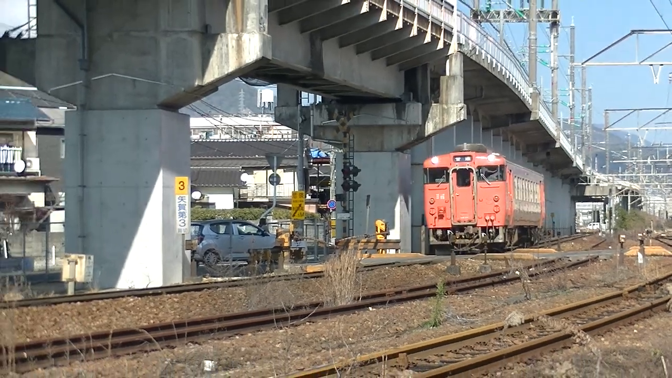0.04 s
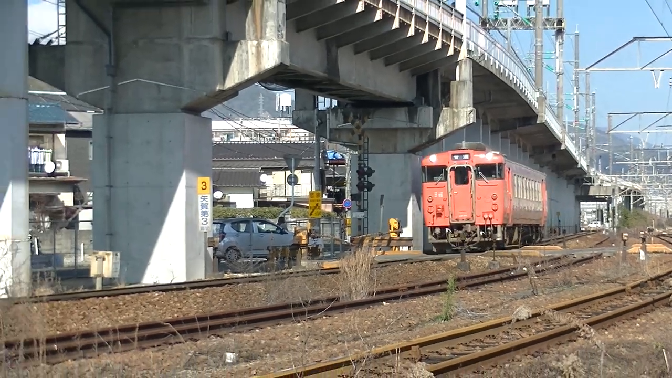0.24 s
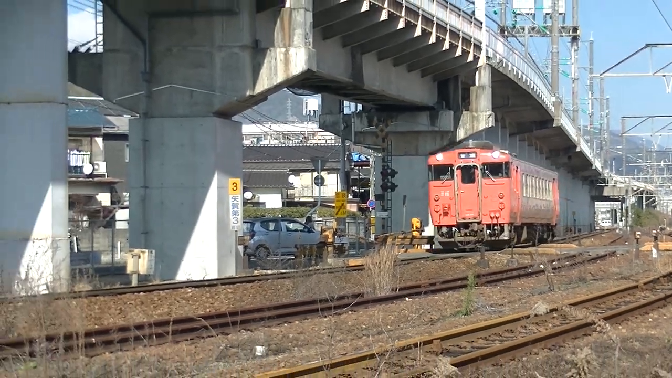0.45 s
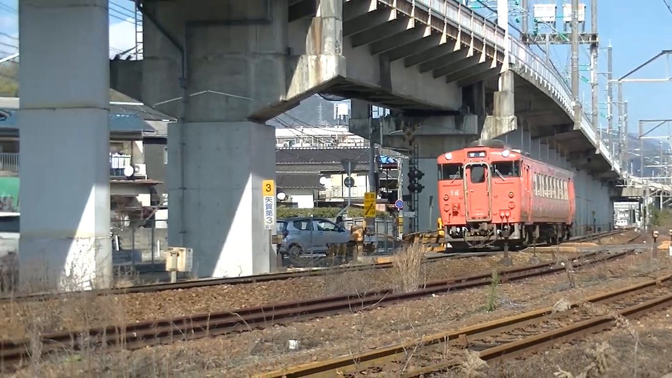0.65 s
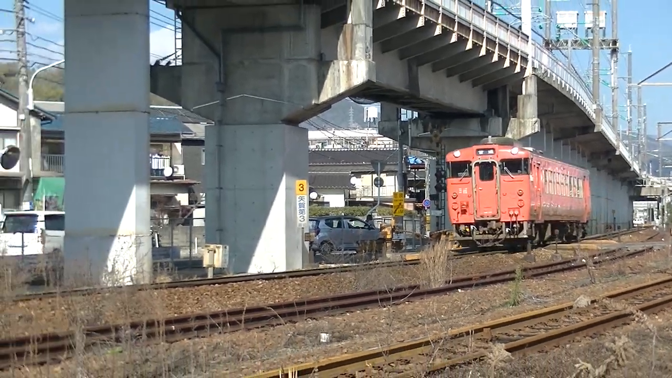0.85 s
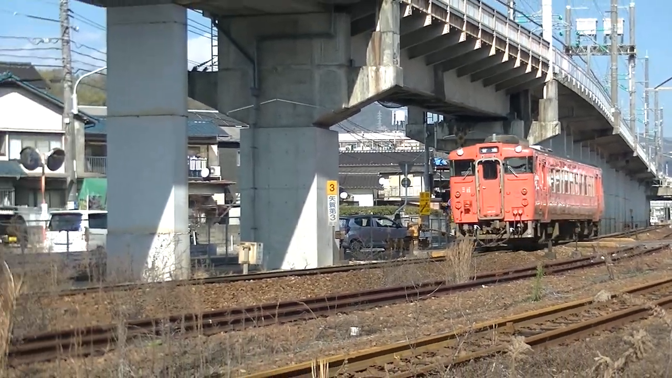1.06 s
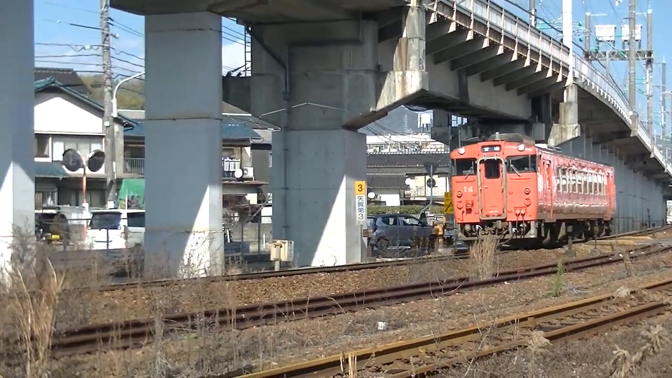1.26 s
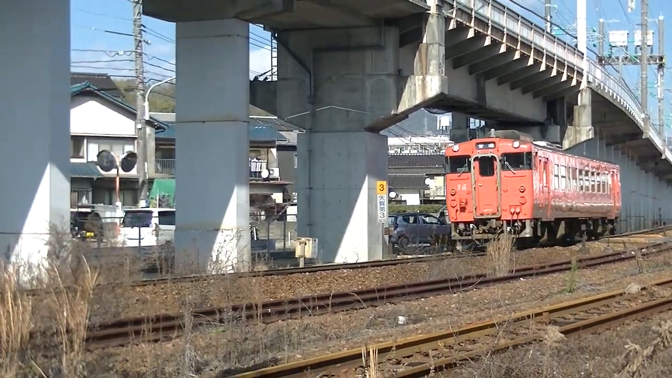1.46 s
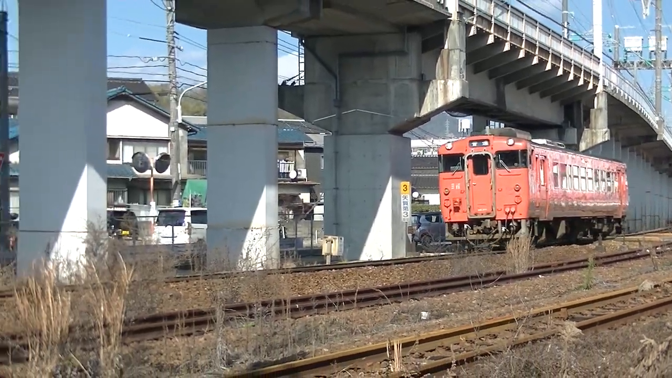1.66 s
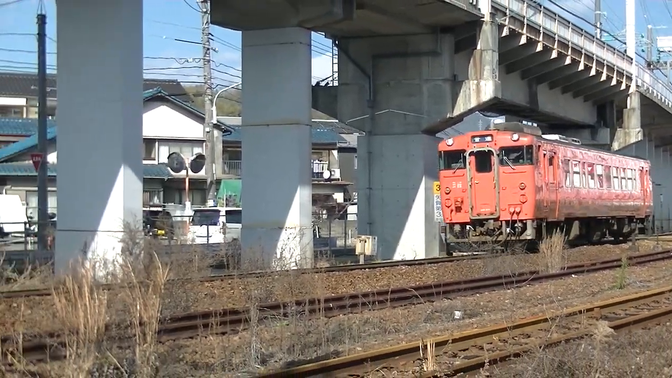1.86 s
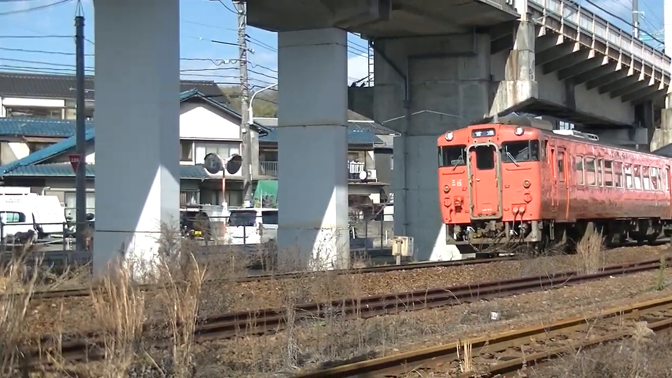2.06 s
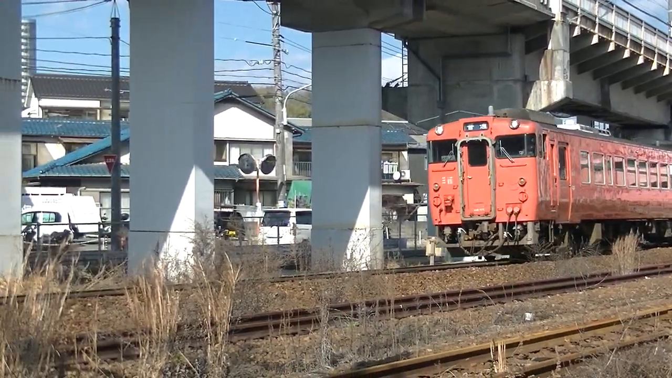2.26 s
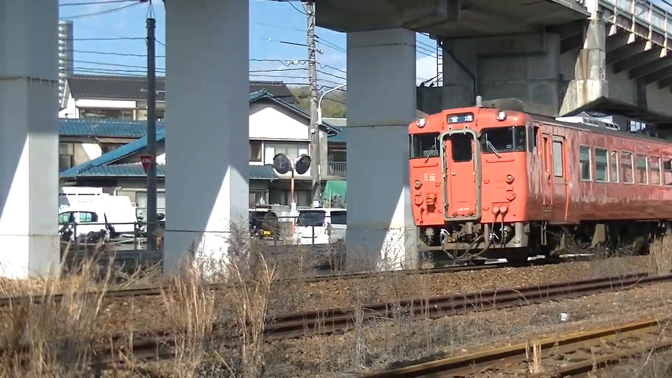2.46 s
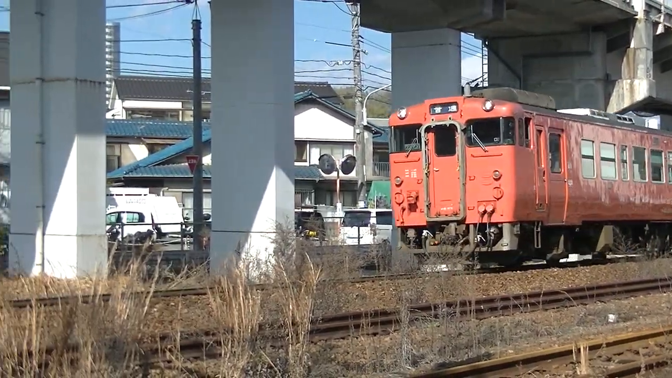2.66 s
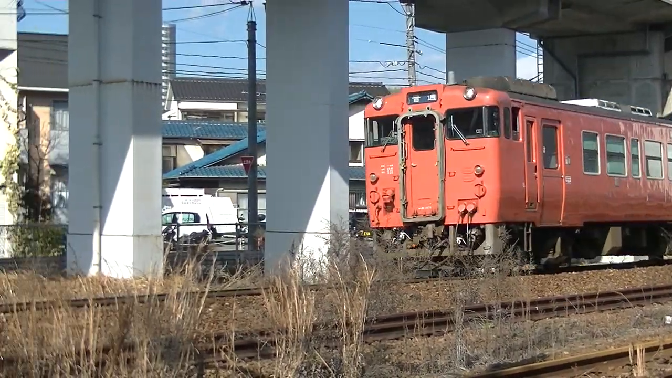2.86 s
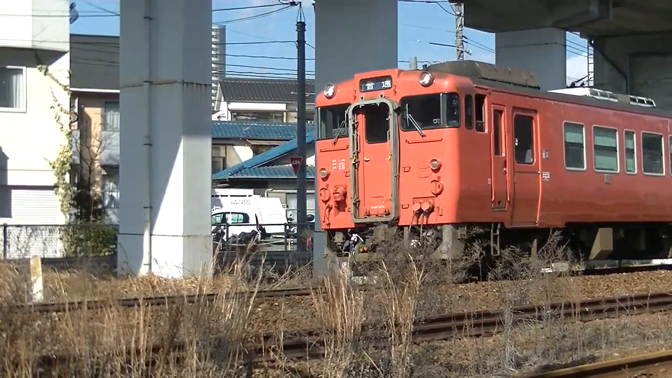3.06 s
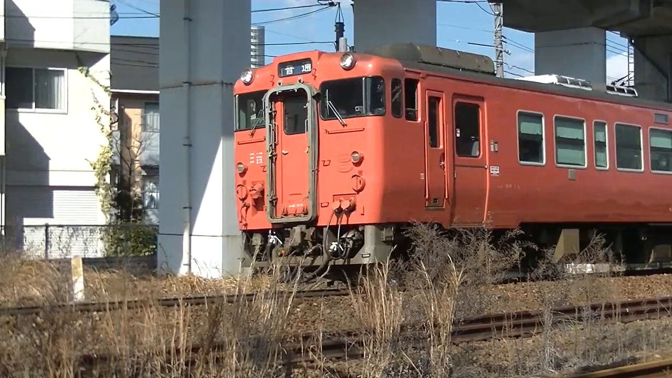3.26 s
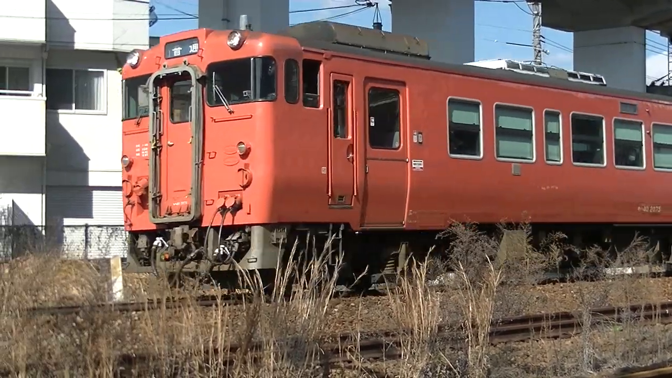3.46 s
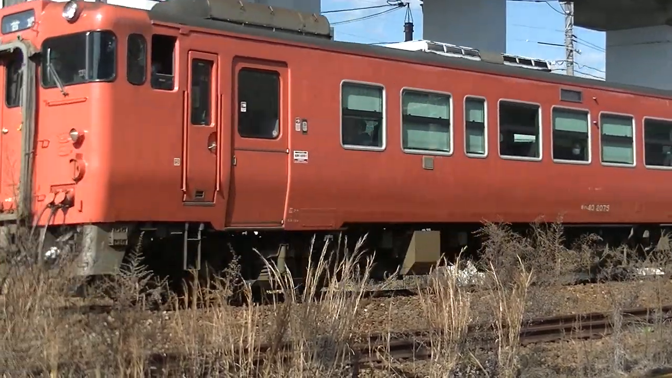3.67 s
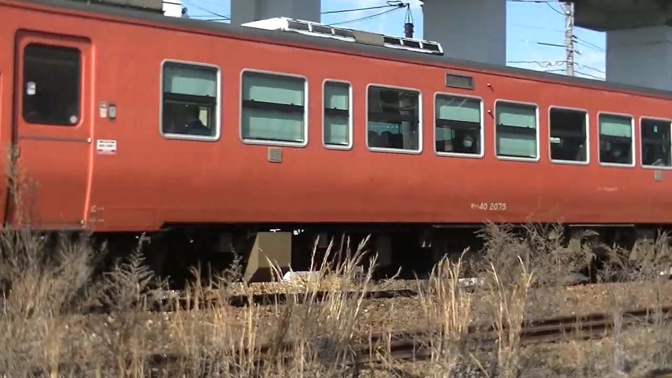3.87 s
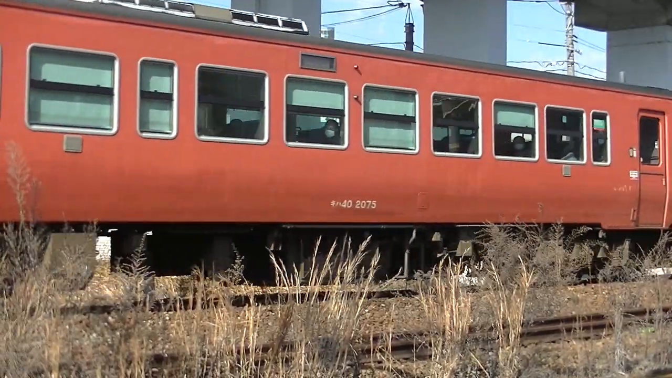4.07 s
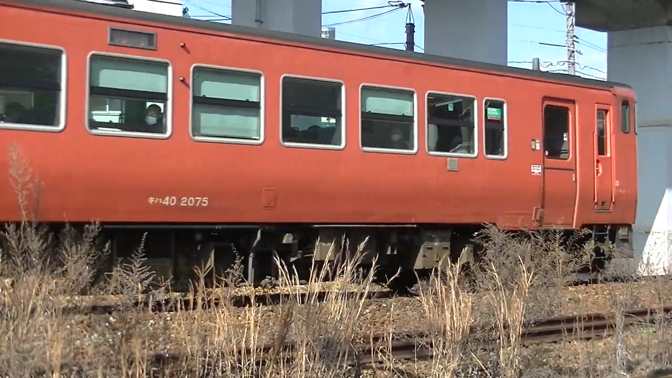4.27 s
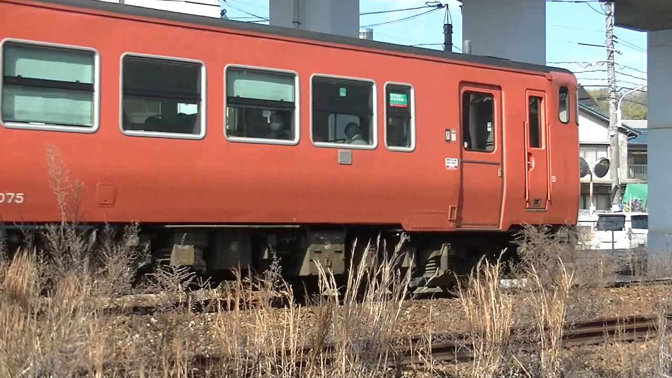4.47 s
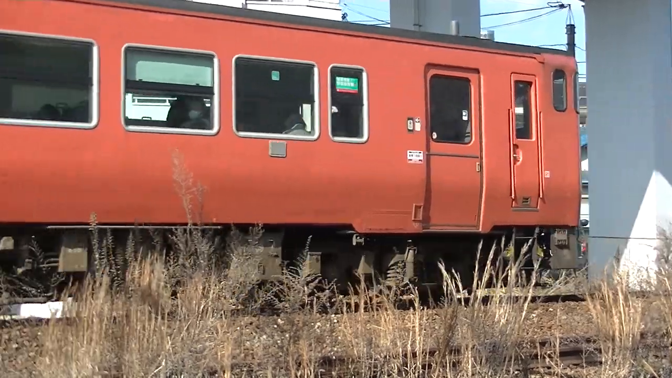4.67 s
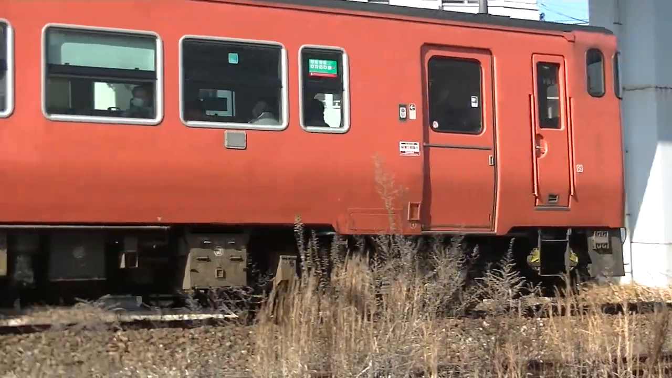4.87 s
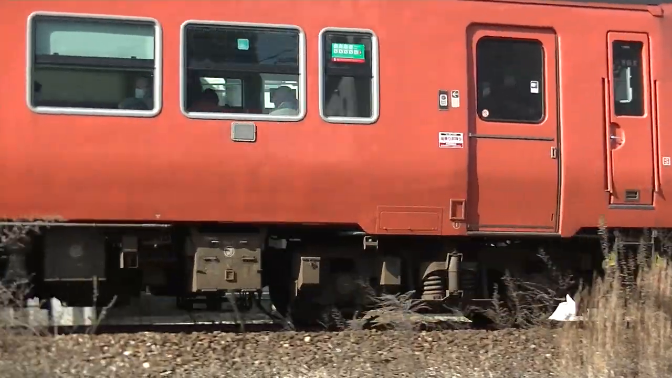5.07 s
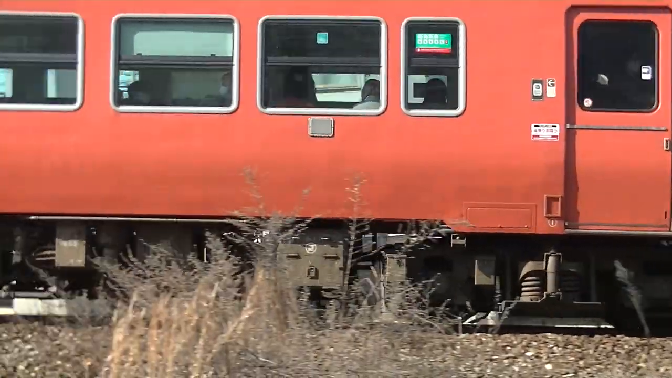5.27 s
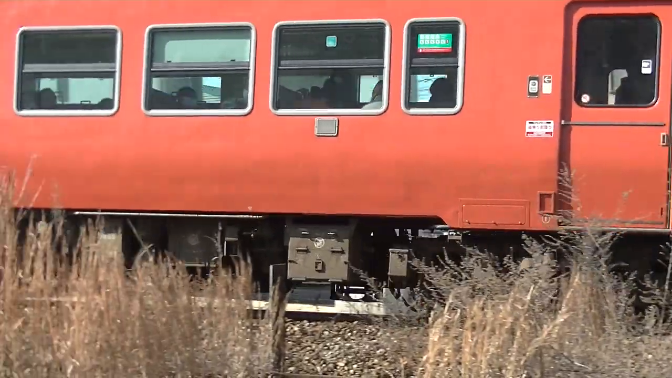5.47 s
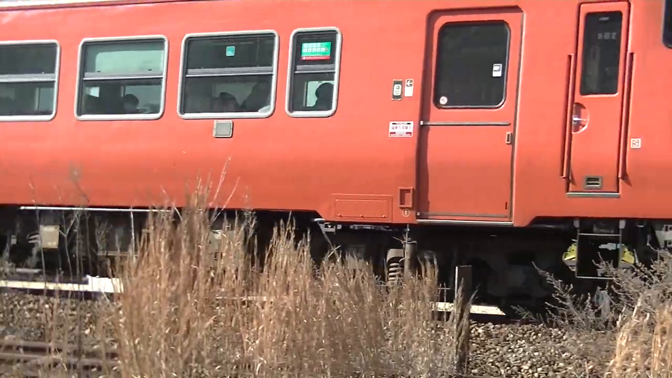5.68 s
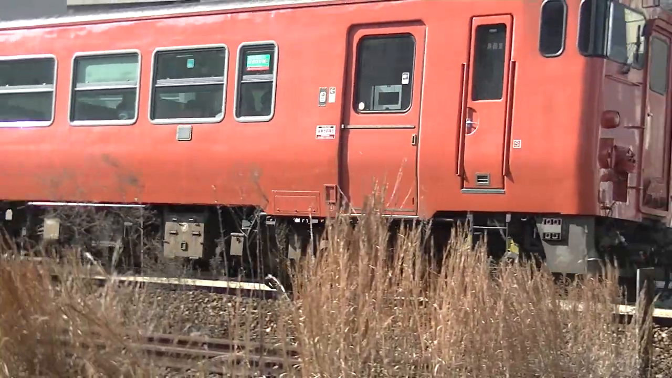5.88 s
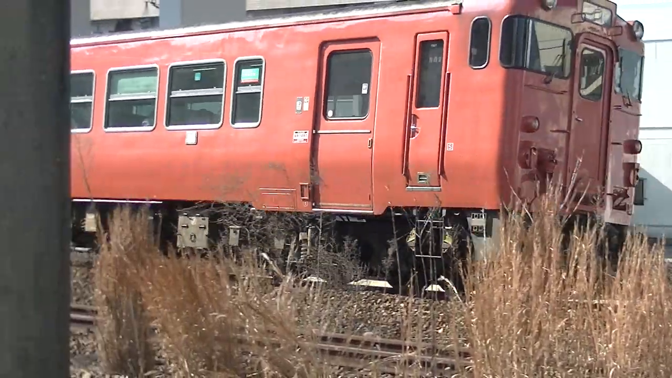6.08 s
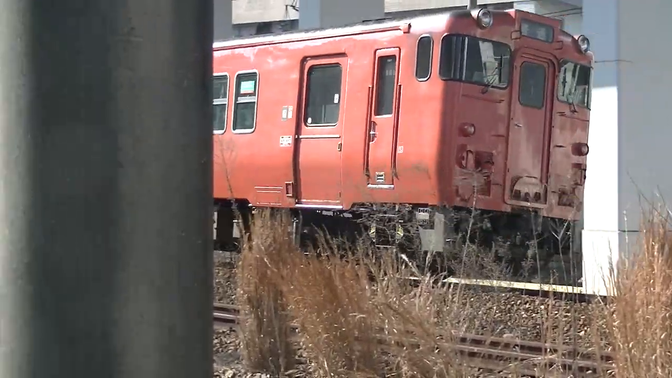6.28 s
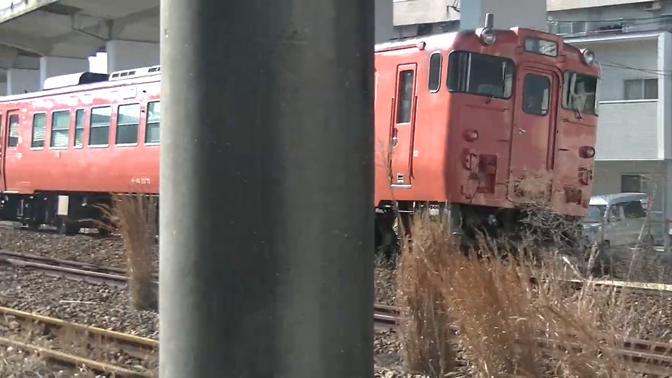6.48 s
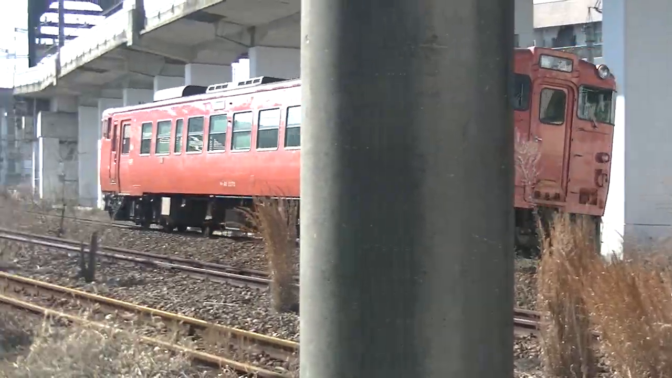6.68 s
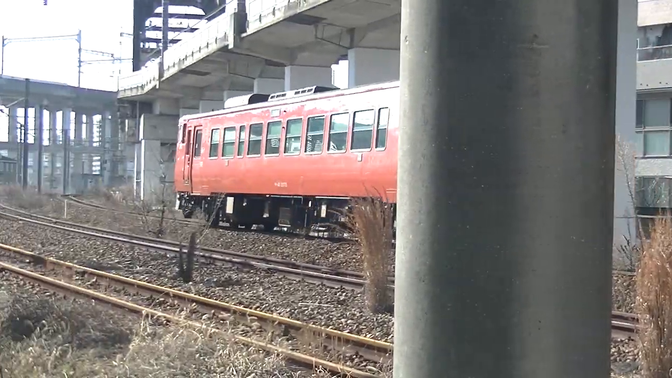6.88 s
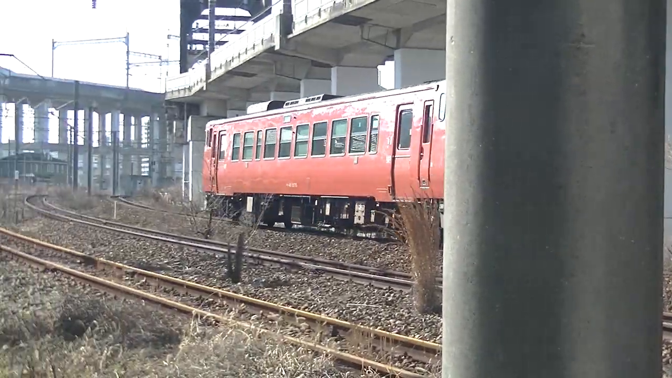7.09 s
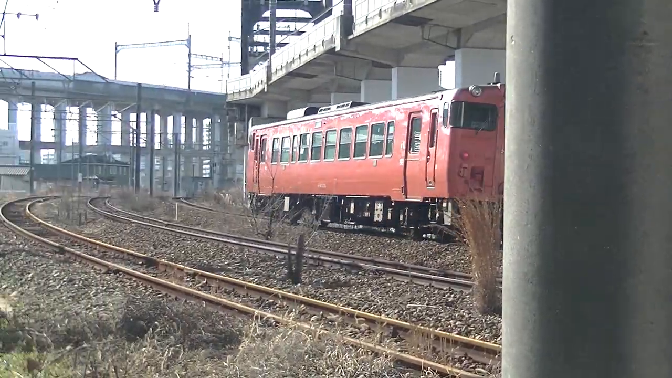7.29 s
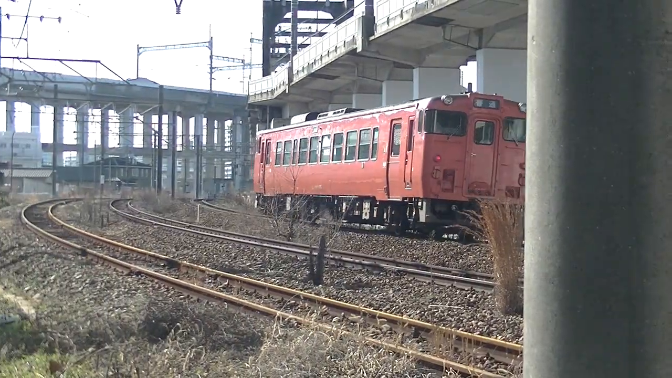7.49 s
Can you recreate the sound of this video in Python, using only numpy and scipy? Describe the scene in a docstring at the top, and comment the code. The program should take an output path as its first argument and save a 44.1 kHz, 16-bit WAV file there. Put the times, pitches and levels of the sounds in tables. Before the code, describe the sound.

A single diesel railcar approaches, clatters past very close over rail joints with a roaring, ringing rush, then recedes before one sharp nearby click.

```python
"""A single diesel railcar rolls past a two-port trackside microphone under a viaduct.
From the start: faint port air, rolling noise in six bands, ringing wheels and engine hum as driven modes,
their pitch gliding down as they pass. From 1.3 s joints thump: struck track modes plus decaying noise.
From 2.6 s flanges squeak, loose metal ticks and thin wheezes sound, all puffs of band-limited noise.
At 7.08 s a small part clicks close by: three touches on decaying sines."""
import sys
import numpy as np
from scipy import signal
from scipy.fft import rfft, irfft, next_fast_len
from scipy.io import wavfile
from scipy.ndimage import map_coordinates

SR = 44100
rng = np.random.default_rng(int(sys.argv[2]) if len(sys.argv) > 2 else 0)


def master_out(mix):
    """Clip the mix to full scale and print it as 16-bit PCM to the path in sys.argv[1]."""
    frames = np.transpose(np.atleast_2d(mix))
    ceiling = np.clip(frames, -1, 1)
    pcm = np.round(ceiling * 32767).astype(np.int16)
    wavfile.write(sys.argv[1], SR, pcm)


N = 332234
SIZE = next_fast_len(N)
HZ = np.maximum(np.arange(SIZE // 2 + 1) * SR / SIZE, 1)
TIME = np.arange(N) / SR


def amp(db):
    """dB to gain."""
    return 10 ** (np.asarray(db) / 20)


def at_hz(points):
    """A table read at every frequency bin, on a log axis."""
    hz, value = np.transpose(points)
    return np.interp(np.log(HZ), np.log(np.maximum(hz, 1)), value)


def noise(shape):
    """A direct and a diffuse draw of noise with this amplitude spectrum; rms 1."""
    real, imag = rng.standard_normal((2, 2, len(HZ)))
    x = irfft(shape * (real + 1j * imag), SIZE)[:, :N]
    return x / x.std(axis=1, keepdims=True)


def resonance(hz, width_hz):
    """Amplitude response of one mode."""
    return 1 / np.sqrt(1 + (2 * (HZ - hz) / width_hz) ** 2)


def drift(rate_hz):
    """Slow chance, spread 1."""
    return noise(1 / (1 + (HZ / rate_hz) ** 2))[0]


def port_air():
    """Faint air movement at each port: low noise, unrelated in the two."""
    corner_hz, level_db = 80, -92
    return amp(level_db) * noise(1 / (1 + (HZ / corner_hz) ** 2))


# rolling noise as the railcar nears and leaves:
# (time [s], roar level [dB], hiss level [dB], sizzle level [dB], left-right [dB])
ROLLING_CURVES = [(0.0, -44.5, -62, -64.5, 0), (1.15, -41.5, -54, -63.5, 0), (1.5, -40, -50, -62.5, 0),
                  (2.2, -39, -45.5, -59.5, -0.5), (2.7, -36, -38.5, -55, -0.5), (3.1, -32, -36, -51.5, 0),
                  (3.4, -29, -34.5, -49.5, -0.5), (3.56, -28, -31.5, -40.5, -0.2), (3.9, -24, -31, -43, -1),
                  (4.1, -22.5, -28.5, -38.5, 0), (4.5, -21.5, -39, -39, 1.5), (4.85, -21.5, -31, -38.5, 1),
                  (5.2, -20.5, -33.5, -38.5, 0.5), (5.56, -22.5, -29, -39, -0.5), (6.05, -24, -32, -44, 0),
                  (6.5, -27, -35, -47, 0.5), (6.85, -30, -40, -50, 1), (7.17, -29.5, -37, -45.5, 1),
                  (7.53, -32.5, -40.5, -48.5, 2)]


def curve(column):
    """One column of the rolling table at every sample."""
    points = np.array(ROLLING_CURVES)
    return np.interp(TIME, points[:, 0], points[:, column])


# thrum, boom and rail rumble follow the roar:
# (level at REF_ROAR_DB [dB], share of the roar's swing [1], lead, negative = late [s])
LOW_LAYERS = [(-45, 0.68, -0.11), (-31.5, 0.84, -0.071), (-29, 0.76, -0.041)]
REF_ROAR_DB = -22
# the thrum is shaded until the railcar clears a pier
PIER_CLEAR_S, PIER_EDGE_S, PIER_SHADE_DB = 1.48, .05, -12.5


def layer_db(index):
    """Level of one layer: the upper three have their own curves, the lower three follow the roar."""
    if index >= len(LOW_LAYERS):
        return curve(column=index - 2)
    ref_db, share, lead_s = LOW_LAYERS[index]
    s, roar_db = np.transpose(ROLLING_CURVES)[:2]
    swing_db = np.interp(TIME + lead_s, s, roar_db) - REF_ROAR_DB
    shade = (index == 0) * (1 - np.tanh((TIME - PIER_CLEAR_S) / PIER_EDGE_S)) / 2
    return ref_db + share * swing_db + PIER_SHADE_DB * shade


# wheels over rail joints: each crossing a clatter of one or several close blows:
# (time [s], thud level [dB], knock level [dB], clack level [dB], extra on deep track modes [dB])
JOINT_BLOWS = [(1.299, -32, -34, -33, 6), (1.335, -39, -28, -33, 0), (1.389, -38, -34, -40, 0),
               (1.42, -39, -36, -40, 0), (1.445, -41, -30, -31, 0), (1.472, -43, -29, -38, 0),
               (1.794, -38, -48, -28, 0), (1.937, -40, -34, -38, 0), (2.449, -42, -24.5, -29, 0),
               (2.857, -44, -24, -30, 0), (2.885, -31.5, -27, -18, 0), (2.91, -38, -35, -21, 0),
               (3.004, -36, -28, -19, 0), (3.041, -37, -35, -16, 0), (3.375, -32, -19, -14, 0),
               (3.538, -27, -16, -12, 0), (3.878, -44, -14, -22, 0), (4.078, -37, -26, -12, 0),
               (4.34, -25, -18, -16, 0), (4.388, -23, -24, -16, 2), (4.405, -20.5, -19, -9, -4),
               (4.49, -23, -20, -16, -2), (4.508, -21, -17, -14, -3), (4.528, -23, -24, -20, -5),
               (4.631, -21, -19, -19, -8), (4.648, -21.5, -16, -8, 4), (5.068, -44, -10, -22, 0),
               (5.344, -27, -14, -20, 0), (5.464, -22, -15, -16, 2), (5.498, -22, -28, -18, 3),
               (5.53, -25, -28, -22, 4), (5.596, -22, -18, -12, -12), (5.604, -16, -16, -7, -9),
               (5.994, -31, -13, -8.5, 0), (6.024, -29, -30, -15, 0), (6.149, -28, -34, -18, -6),
               (6.55, -44, -31, -15, 0)]
CREST_DB = 14  # peak over rms of a burst of noise


def bursts(peak_db, t60_s, rise_s=0.00066):
    """Envelope that jumps at each blow and dies away."""
    marks = np.full(N, 1e-18)
    marks[(np.array(JOINT_BLOWS)[:, 0] * SR).astype(int)] = amp(peak_db - CREST_DB)
    fall, climb = amp(-60 / (t60_s * SR)), np.exp(-1 / (rise_s * SR))
    return signal.lfilter([1 - climb], np.convolve([1, -fall], [1, -climb]), marks)


# band edges of thrum, boom, rail rumble, roar, hiss, sizzle: (edge [Hz])
BAND_EDGES_HZ = [20, 250, 650, 1400, 4500, 7600, 18000]
# colour of the rolling noise, relative within each band: (frequency [Hz], density [dB])
ROLLING_COLOUR = [(25, -100), (60, -76), (85, -53), (130, -17.5), (220, -8), (380, 5), (650, 2.5),
                  (900, 2.5), (1500, 0), (2200, 0), (4200, 1), (5000, -2), (7000, -6), (7900, -17.5),
                  (9200, -23.5), (12000, -27.5), (16000, -32.5)]
BOOM_T60_S, KNOCK_T60_S, CLACK_T60_S, RATTLE_T60_S = .16, .16, .22, .14
VIADUCT_DB, VIADUCT_T60_S = -13, 1  # the deck overhead returns the low blows as a rumble
BOOM_RE_THUD_DB, RATTLE_RE_CLACK_DB = -4, -17.5


def rolling():
    """Rough wheels on rough rails shake six layers of noise; joints kick the layers briefly."""
    _, thud_db, knock_db, clack_db, _ = np.transpose(JOINT_BLOWS)
    boom = bursts(thud_db + BOOM_RE_THUD_DB, BOOM_T60_S)
    boom += bursts(thud_db + VIADUCT_DB, VIADUCT_T60_S, rise_s=0.046)
    knock = bursts(knock_db, KNOCK_T60_S)
    knock += bursts(knock_db + VIADUCT_DB, VIADUCT_T60_S, rise_s=0.035)
    clack = bursts(clack_db, CLACK_T60_S)
    rattle = bursts(clack_db + RATTLE_RE_CLACK_DB, RATTLE_T60_S)
    kicks = [amp(-31.0) * boom, boom, amp(1.5) * knock, clack, amp(-7) * clack, rattle]
    flicker_db = [1.0, 0.75, 0.069, 0.23, 0.8, 0.97]
    colour, together, out = amp(at_hz(ROLLING_COLOUR)), drift(60), 0
    for k, (low, high) in enumerate(zip(BAND_EDGES_HZ, BAND_EDGES_HZ[1:])):
        band = 1 / np.sqrt((1 + (low / HZ) ** 12) * (1 + (HZ / high) ** 12))
        flicker = .6 * together + drift(10)
        steady = amp(layer_db(k) + flicker_db[k] * flicker)
        out = out + np.hypot(steady, kicks[k]) * noise(colour * band)
    knock_ring = noise(colour * resonance(hz=830, width_hz=418) ** 2)
    return out + amp(-2.0) * knock * knock_ring


SPEED_M_S, TRACK_M, SOUND_M_S = 17, 16, 343
FRONT_ABEAM_S, ENGINE_ABEAM_S, REAR_ABEAM_S = 4.65, 4.9, 5.55
WAVER_HZ = 12  # how fast ringing swells and fades


def passing(modes, abeam_s, drive_db, waver_db):
    """Driven modes, beamed by nearness, heard after the travel time, which bends their pitch."""
    along = SPEED_M_S * (TIME - abeam_s)
    metres = np.hypot(TRACK_M, along)
    body = 0
    for hz, width, db, beam, behind_db in modes:
        level_db = db + behind_db * along / metres + waver_db * drift(WAVER_HZ)
        nearness = (TRACK_M / metres) ** beam
        body = body + amp(level_db) * nearness * noise(resonance(hz, width) ** 2)
    sent_s = TIME - (metres - TRACK_M) / SOUND_M_S  # travel time beyond that abeam
    heard = [map_coordinates(c, [sent_s * SR], order=3, mode="mirror") for c in body]
    return amp(drive_db) * np.array(heard)


# wheel ringing, both bogies: (pitch at rest [Hz], width [Hz], level re roar [dB],
# beam: power of nearness [1], gain from behind re abeam [dB])
FRONT_WHEEL_MODES = [(1200, 260, -11.5, 2, 0), (1880, 280, -12, .1, -2), (2390, 220, -12, .3, -1),
                     (3090, 90, -7.5, 1.6, -4), (3110, 330, -10.5, 0, -2), (3800, 260, -10.5, .1, -4),
                     (4125, 90, -8, 3, -3), (4600, 120, -16, 4, 0), (5490, 90, -21, 4, 0),
                     (6400, 300, -20, .5, -5)]
REAR_WHEEL_MODES = [(1980, 260, -12.5, .4, 0), (2520, 240, -11, 0, 4), (3200, 180, -11, 0, 5),
                    (3985, 120, -7, 1.1, 3), (4780, 50, -19, 3, 0), (5030, 130, -15.5, 2.5, 1),
                    (5280, 90, -19, 4, 0), (5720, 80, -14.5, 3, 1), (6220, 80, -18.5, 3, 0),
                    (6690, 150, -14, 2.5, 0), (7450, 300, -24, 4, 0)]


def wheels():
    """Wheel modes of both bogies ring as the rolling drives them."""
    roar_db = curve(column=1)
    front = passing(FRONT_WHEEL_MODES, FRONT_ABEAM_S, roar_db, waver_db=1.6)
    return front + passing(REAR_WHEEL_MODES, REAR_ABEAM_S, roar_db, waver_db=1.6)


# engine hum and hum from the rear end: (pitch at rest [Hz], width [Hz], level re thrum [dB],
# beam: power of nearness [1], gain from behind re abeam [dB])
ENGINE_MODES = [(178, 23, -7, 0.1, 0), (198, 5.5, -10.5, 0.5, 0), (286.6, 11, 6, 1.7, 0),
                (389, 56, 4, 0.048, 0)]
REAR_HUM_MODES = [(290, 30, 5.1, 4.4, 0)]


def engine():
    """Low modes hum at the engine and the rear end, following the thrum level."""
    thrum_db = layer_db(index=0)
    hum = passing(ENGINE_MODES, ENGINE_ABEAM_S, thrum_db, waver_db=2.0)
    return hum + passing(REAR_HUM_MODES, REAR_ABEAM_S, thrum_db, waver_db=2.5)


# cooling air: (pitch at rest [Hz], width [Hz], level re roar [dB],
# beam: power of nearness [1], gain from behind re abeam [dB])
FAN_MODES = [(4760, 910, -6.5, 3.7, 0)]


def fan():
    """Cooling air blown sideways from under the floor: a broad band beamed abeam."""
    return passing(FAN_MODES, ENGINE_ABEAM_S, curve(column=1), waver_db=0.4)


# rail on sleepers: (pitch [Hz], level [dB], t60 [s])
RAIL_MODES = [(205, -12, .12), (270, -5, .15), (385, -2, .14), (470, -1, .12), (560, -3, .1)]
DEEP_HZ = 330  # track modes under this count as deep


def thuds():
    """Each blow strikes every track mode, a little late and with a strength of its own."""
    s, peak_db, *_, deep_db = np.transpose(JOINT_BLOWS)
    out = np.zeros(N)
    for hz, db, t60 in RAIL_MODES:
        late, strength = rng.standard_normal((2, len(s)))
        blows = np.full(N, 1e-18)
        at = ((s + .003 * abs(late)) * SR).astype(int)
        blows[at] = amp(peak_db + db + deep_db * (hz < DEEP_HZ) + 0.13 * strength)
        r, w = amp(-60 / (t60 * SR)), 2 * np.pi * hz / SR
        out += signal.lfilter([0, np.sin(w)], [1, -2 * r * np.cos(w), r * r], blows)
    # heavy, soft contact
    soft = signal.sosfilt(signal.butter(5, [190, 900], "band", fs=SR, output="sos"), out)
    return np.array([soft, np.roll(soft, 60)])  # diffuse part: 60 samples late


def puffs(rows):
    """Puffs of band-limited noise from rows of (time [s], level [dB], pitch [Hz], width [Hz], length [s])."""
    out, white = np.zeros((2, N)), rng.standard_normal((2, N))
    for s, db, hz, width, length in rows:
        i, n = int(s * SR), int(length * SR)
        band = signal.butter(2, [hz - width / 2, hz + width / 2], "band", fs=SR, output="sos")
        puff = signal.sosfilt(band, white[:, i - 999:i + n])[:, 999:]  # 999 samples of run-in
        out[:, i:i + n] += amp(db) * np.hanning(n) ** .5 * puff / puff.std()
    return out


# flange squeaks: (time [s], level [dB], pitch [Hz], length [s])
FLANGE_SQUEAKS = [(2.618, -40, 6630, 0.047), (2.79, -36, 6700, 0.027), (2.823, -35, 6650, 0.033),
                  (3.114, -34, 6470, 0.037), (6.498, -24, 3920, 0.03), (7.507, -35, 5030, .012)]


def squeaks():
    """Flanges brush the rail: short bands 4.5 % of the pitch wide."""
    return puffs([(s, db, hz, 0.045 * hz, length) for s, db, hz, length in FLANGE_SQUEAKS])


# ticks of loose metal: (time [s], level [dB], pitch [Hz], width [Hz], length [s])
METAL_TICKS = [(2.63, -60, 11500, 2500, .03), (3.041, -23, 1400, 1800, .008),
               (3.043, -49, 10000, 5000, .004), (3.566, -38, 10300, 5000, .005),
               (3.38, -53, 11500, 7000, .03), (3.80, -50, 12000, 5000, .035), (4.06, -46, 12500, 6000, .05),
               (4.19, -47, 10800, 2500, .02), (4.228, -46, 10500, 2500, .025)]


def ticks():
    """Loose metal ticks: brief, wide bands."""
    return puffs(METAL_TICKS)


# thin high wheezes: (time [s], level [dB], pitch [Hz], length [s])
THIN_WHEEZES = [(2.91, -57, 10100, .056), (3.66, -49, 10200, .035), (5.603, -48, 13600, .06)]


def wheezes():
    """Thin high wheezes: bands 10 % of the pitch wide."""
    return puffs([(s, db, hz, .1 * hz, length) for s, db, hz, length in THIN_WHEEZES])


# three quick touches: (time [s], level [dB], brightness: gain of all modes but the first [dB])
CLICK_TOUCHES = [(7.08388, -11.5, 1.5), (7.08459, -2, -19), (7.08547, -13, -22)]
# the small part's modes: (pitch [Hz], level [dB], t60 [s])
PART_MODES = [(1205, 0, .007), (2405, -1, .011), (3100, -6, .006), (4180, -8, .007), (5330, -8, .011),
              (6690, -9, .007), (8470, -10, .006), (9300, -14, .005), (9950, -9, .005), (11850, -14, .004)]
CLICK_SIDE_DB, CLICK_SIDE_LAG_S = -9, 0.00022


def click():
    """A small hard plastic part snaps beside one port: each touch starts decaying sines."""
    mid = np.zeros(N)
    for s, peak_db, bright_db in CLICK_TOUCHES:
        i = int(s * SR) + 1
        t = np.arange(900) / SR + i / SR - s
        for k, (hz, db, t60) in enumerate(PART_MODES):
            level_db = peak_db + db + bright_db * (k > 0) - 60 * t / t60
            mid[i:i + len(t)] -= amp(level_db) * np.sin(2 * np.pi * hz * t)
    # the click keeps no bass
    mid = signal.sosfilt(signal.butter(4, [480, 12500], "band", fs=SR, output="sos"), mid)
    side = amp(CLICK_SIDE_DB) * np.interp(TIME - CLICK_SIDE_LAG_S, TIME, mid)
    return np.array([mid + side, mid - side])


# two close ports: (frequency [Hz], diffuse side re mid [dB])
PORT_DIFFUSE = [(25, -5), (80, -13), (130, -85), (300, -18.5), (700, -16), (1400, -11.5), (2600, -9),
                (4200, -17), (8000, -22.5), (15000, -14)]
# (frequency [Hz], left phase lead [rad])
PORT_LEAD = [(0, 0), (340, 0.4), (2670, -0.4), (3530, 0.0), (15600, -0.0)]
# (frequency [Hz], left-right [dB])
PORT_LEAN = [(60, 0.0), (180, 0.61), (550, -0.064), (1650, 0.41), (4970, -0.75), (15000, 0.98)]
# peaks and dips of the microphone housing: (frequency [Hz], width [Hz], gain [dB])
HOUSING_MODES = [(1425, 210, -2), (2870, 270, -2), (4536, 380, -3.5), (6360, 350, -2.5), (6520, 100, 2),
                 (9980, 390, 3.5), (11760, 500, 0)]


def ports(direct, diffuse):
    """Left and right: the direct sound differs by a little phase and level, the diffuse part by sign."""
    housing = 1
    for hz, width, db in HOUSING_MODES:
        housing = housing * (1 + (amp(db) - 1) * resonance(hz, width) ** 2)
    half = amp(at_hz(PORT_LEAN) / 2) * np.exp(.5j * at_hz(PORT_LEAD))
    mid, side = rfft(direct, SIZE), rfft(diffuse, SIZE) * amp(at_hz(PORT_DIFFUSE))
    return irfft(housing * np.array([mid * half + side, mid / half - side]), SIZE)[:, :N]


def scene():
    """Railcar through the ports, leaning left or right over time, plus port air and near click."""
    railcar = rolling() + wheels() + engine() + fan()
    railcar = railcar + thuds() + squeaks() + ticks() + wheezes()
    lean_db = curve(column=4)
    return port_air() + ports(*railcar) * amp([lean_db / 2, -lean_db / 2]) + click()


def record(dry):
    """The top is cut steeply."""
    cutoff_hz = 15780
    return signal.sosfilt(signal.ellip(14, .3, 70, cutoff_hz, fs=SR, output="sos"), dry)


dry = scene()
out = record(dry)
master_out(out)
```